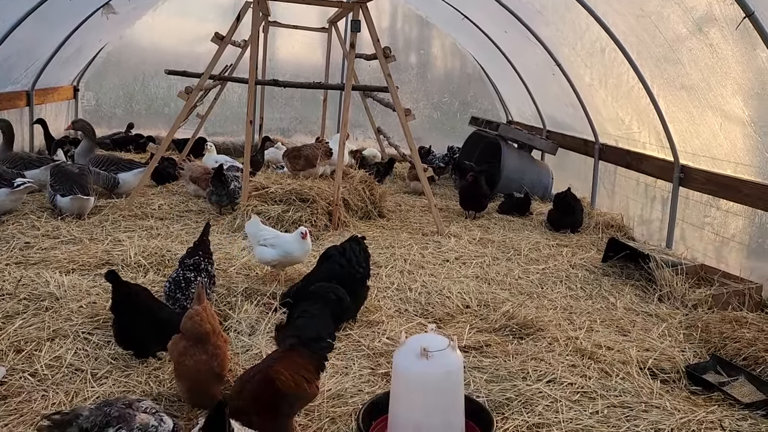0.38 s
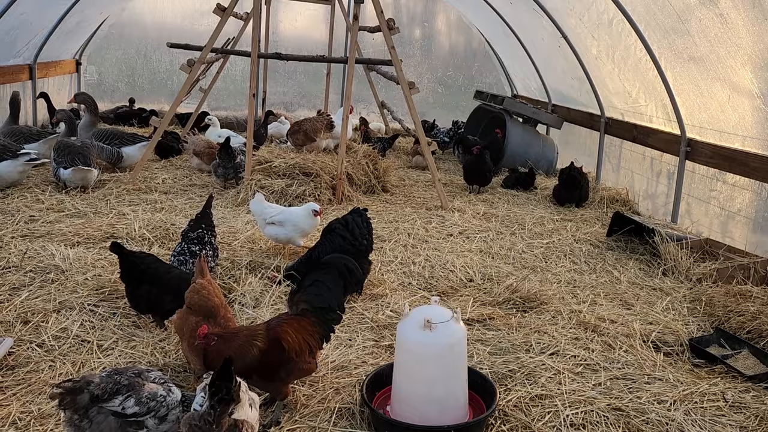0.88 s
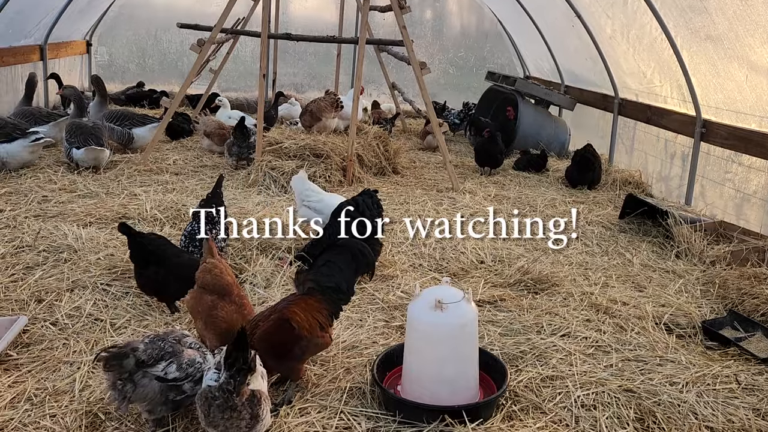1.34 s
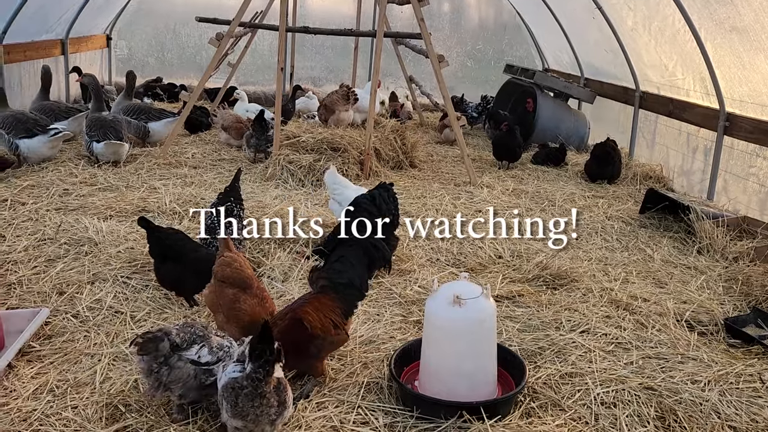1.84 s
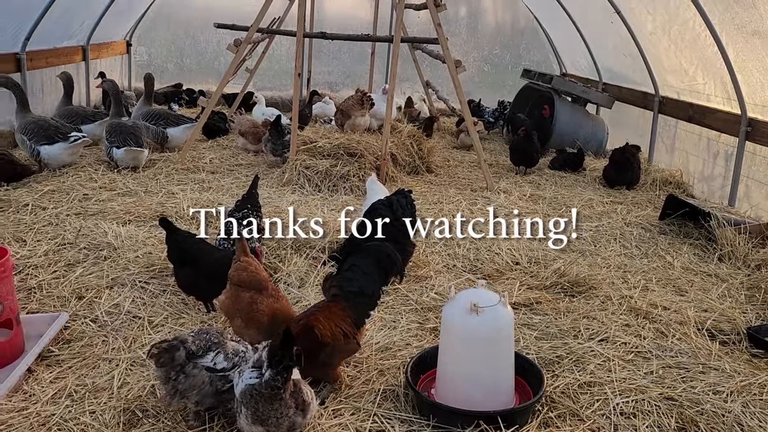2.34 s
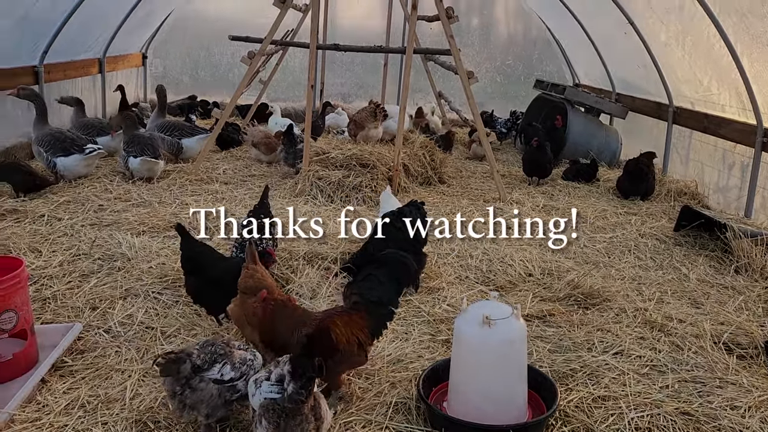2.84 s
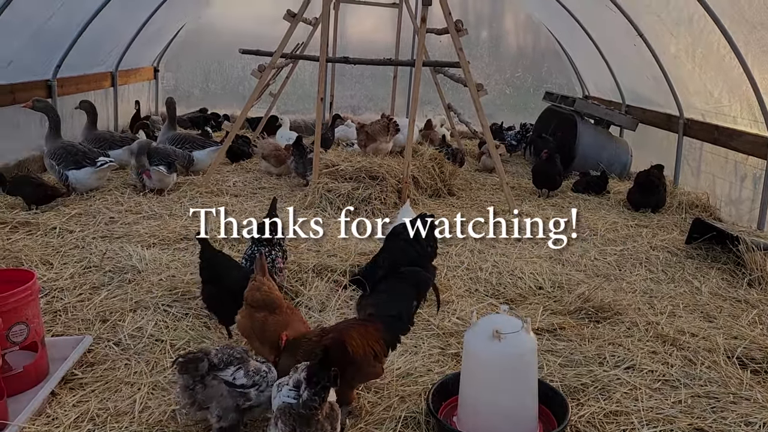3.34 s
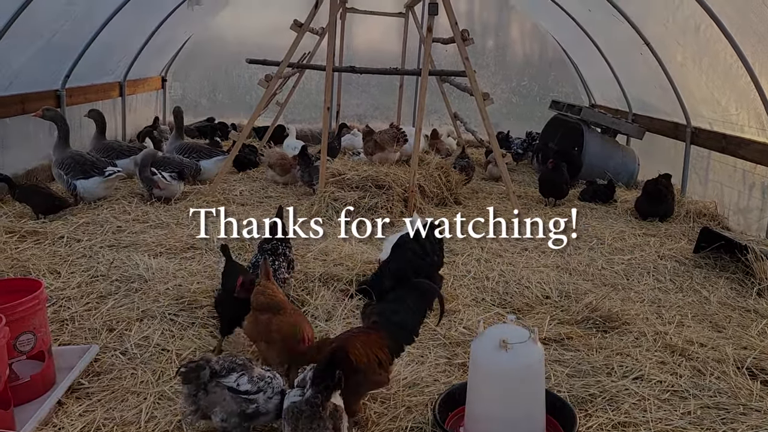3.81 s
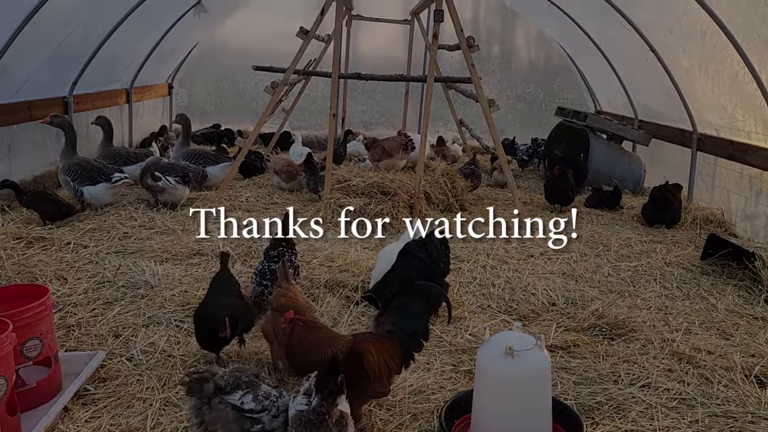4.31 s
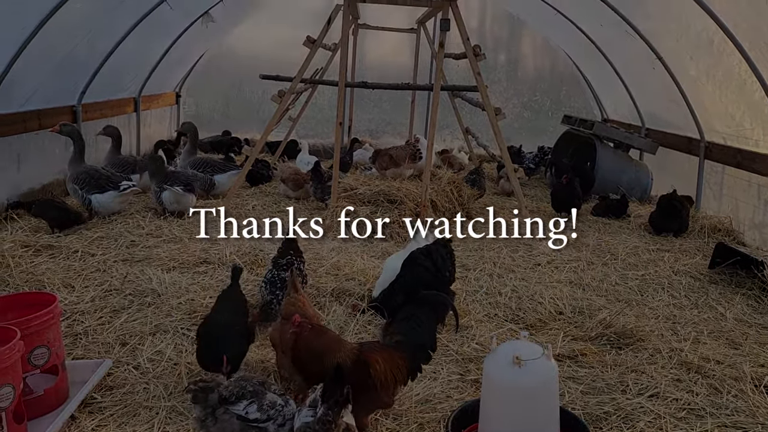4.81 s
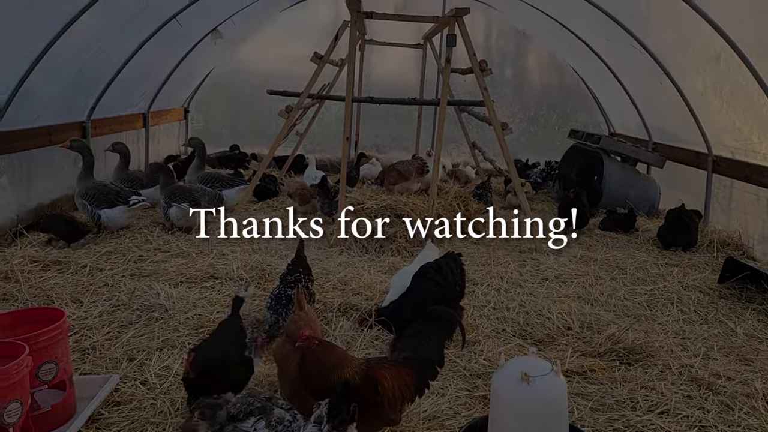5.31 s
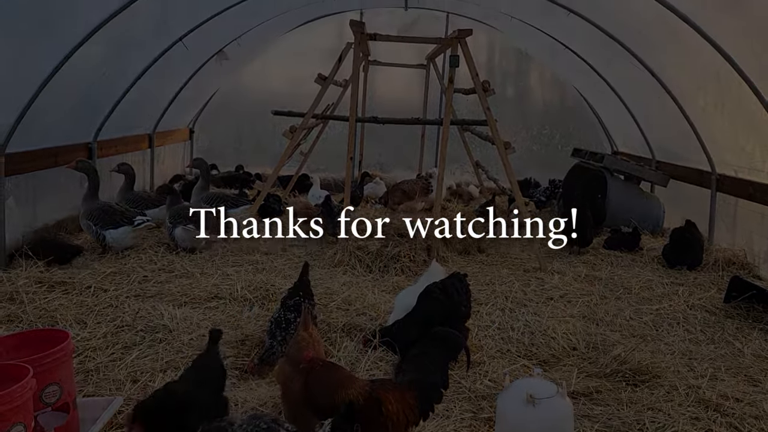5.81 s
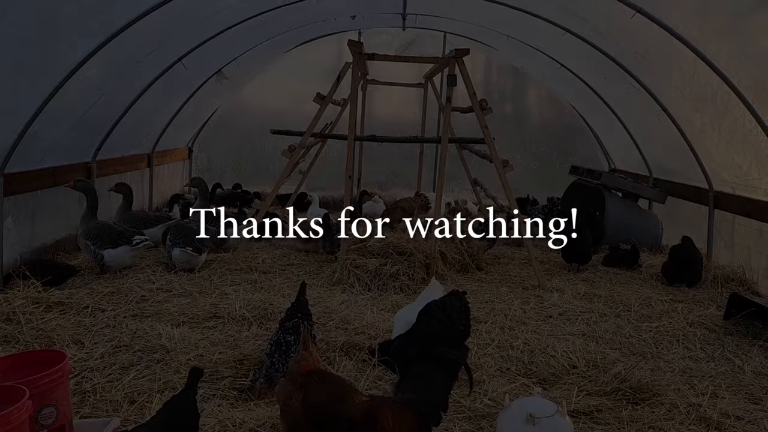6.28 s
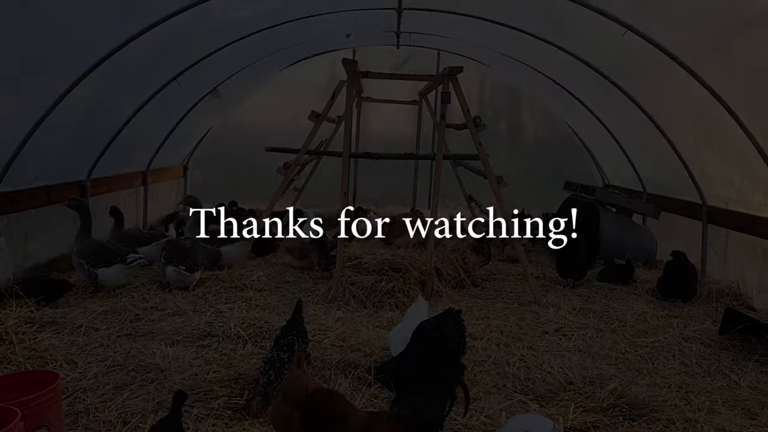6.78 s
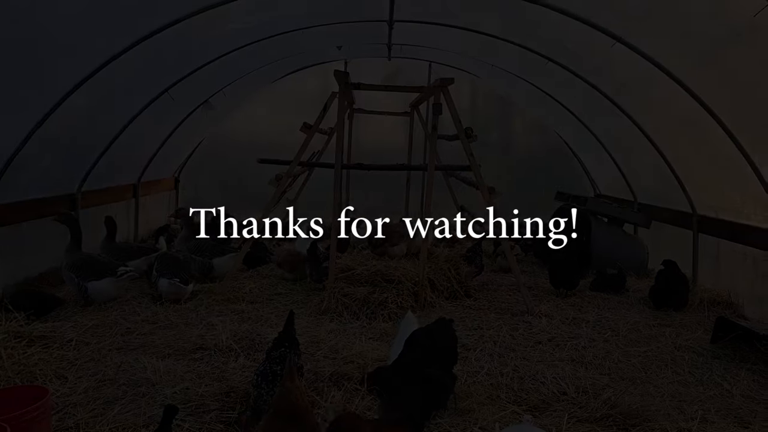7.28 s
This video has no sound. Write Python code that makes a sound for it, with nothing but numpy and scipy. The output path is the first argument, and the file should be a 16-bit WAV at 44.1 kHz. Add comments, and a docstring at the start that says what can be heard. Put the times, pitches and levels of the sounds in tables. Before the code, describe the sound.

Inside a straw-floored plastic shelter, rapid goose honking gives way to clucks, sharp squawks and three drawn-out, cracking hen calls as ambience fades.

```python
"""Geese gabble and honk at the far end of a straw-floored plastic tunnel: harmonic tones and puffed pulses
excite throat resonances. A near hen sings long wavering notes, with period doubling on the low ones, and
hens cluck. Filtered noise makes straw rustle, snaps and wind on the sheeting; decaying low sines make
footfalls. The birds ring in a short noise tail; straw bed and wind fade slowly."""
import sys
import numpy as np
from scipy import signal
from scipy.fft import rfft, irfft, next_fast_len
from scipy.io import wavfile
from scipy.ndimage import uniform_filter1d, map_coordinates

SR = 44100
rng = np.random.default_rng(int(sys.argv[2]) if len(sys.argv) > 2 else 0)


def volts_from_db(level):
    """Convert decibel levels to linear amplitude ratios."""
    exponent = np.asarray(level, float) / 20
    return 10 ** exponent


def transcribe(signal):
    """Save signal, clipped to [-1, 1], as a 16-bit WAV file at the path in sys.argv[1]."""
    frames = np.atleast_2d(signal).T
    limited = np.clip(frames, -1, 1)
    pcm = np.round(limited * 32767).astype(np.int16)
    wavfile.write(sys.argv[1], SR, pcm)


N = 337353  # samples


def unit(x):
    """Power normalisation: scales a signal to rms 1."""
    return x / np.sqrt(np.mean(x ** 2) + 1e-20)


def along(points, hz):
    """Spectral envelope: interpolates (frequency [Hz], value) points on a log frequency axis."""
    f, v = np.transpose(points)
    return np.interp(np.log(hz + 1), np.log(f + 1), v)


def wobble(rate, size=N):
    """Band-limited randomness: a smooth curve through random knots, rate knots a second."""
    knots = rng.standard_normal(int(size * rate / SR) + 4)
    return map_coordinates(knots, [np.arange(size) * rate / SR])


def filtered(x, response):
    """Linear filtering: multiplies the spectrum by a response of frequency."""
    m = next_fast_len(len(x) + SR // 8)
    return irfft(rfft(x, m) * response(np.fft.rfftfreq(m, 1 / SR)), m)[:len(x)]


def modes(table, ratio):
    """Modal superposition: causal resonances of alternating sign, all centres moved by one ratio."""
    def response(f):
        return sum((-1) ** k * volts_from_db(db) * 1j * f * w / ((c * ratio) ** 2 - f * f + 1j * f * w)
                   for k, (c, w, db) in enumerate(table))
    return response


def add(track, s, x):
    """Linear superposition: mixes x into the track from time s."""
    part = track[max(round(s * SR), 0):][:len(x)]
    part += x[:len(part)]


def breath(length, rise):
    """Breath envelope: progress 0-1 through a call and the swell of its air pressure."""
    u = np.linspace(0, 1, max(round(length * SR), 2))
    return u, np.sin(np.pi * u ** rise)


def stack(pitch, throat_db, flutter_db):
    """Source-filter voice: harmonics weighted by the throat, each fluttering on its own, rms 1."""
    k = np.arange(1, int(min(SR / 5 / pitch.max(), 30)) + 1)[:, None]
    phase = 2 * np.pi * np.cumsum(pitch) / SR
    flutter = np.array([wobble(57.0, size=len(pitch)) for _ in k])
    level_db = throat_db(k * pitch) + flutter_db * np.sqrt(np.minimum(k, 4)) * flutter
    return unit(np.sum(volts_from_db(level_db) * np.cos(k * phase - k * k / 4), axis=0))


def fade_db():
    """Slow amplitude envelope shared by the straw bed and the wind."""
    # level offset: (time [s], level [dB])
    fade = [(0, 2.5), (3.1, 0.5), (6.3, -3.5), (7, -9), (7.65, -11)]
    return np.interp(np.arange(N) / SR, *np.transpose(fade))


def honks():
    """Amplitude modulation: a syrinx tone swoops up, then bends late; throat flutter adds sidebands."""
    # deep goose, bending to one low note: (start [s], length [s], held pitch [Hz], level before shaping [dB])
    deep_honks = [(0.586, 0.073, 620, -29.5), (0.807, 0.04, 578, -33.5), (0.988, 0.072, 574, -30),
                  (1.691, 0.06, 573, -27.5), (1.911, 0.043, 571.7, -33), (2.085, 0.045, 612, -38),
                  (2.244, 0.079, 554, -34.5)]
    # other geese: (start [s], length [s], held pitch [Hz], level before shaping [dB], bill resonance [Hz])
    level_honks = [(0, 0.019, 719, -39.5, 720), (0.148, 0.098, 689.5, -41, 700),
                   (0.206, 0.054, 1059, -42.5, 1030), (0.385, 0.036, 934, -41, 935),
                   (0.748, 0.0578, 1065, -36.5, 2070), (0.903, 0.011, 922, -28.5, 920),
                   (1.242, 0.098, 602, -36.5, 1030), (1.686, 0.01, 635, -33.5, 1250),
                   (1.848, 0.088, 772.5, -36.5, 1040), (2.03, 0.074, 765, -37.5, 1050),
                   (3.759, 0.11, 1004, -60, 2920), (5.958, 0.035, 1040, -60.5, 3120),
                   (6.017, 0.071, 996, -57, 3030)]
    # common throat envelope before bill and shrillness: (frequency [Hz], level [dB])
    trumpet = [(400, 2), (600, 6.5), (1150, -2), (1700, -2), (2100, -12), (3100, 3.5), (4000, -31),
               (5300, -13), (6500, -16.5), (10000, -41.5)]
    deep_end_hz, deep_bill_hz = 466, 1110
    level_sag = 0.88  # final pitch target over held pitch
    shrill_db_per_octave = 15.5

    out = np.zeros(N)
    calls = [(s, length, hz, deep_end_hz, db, deep_bill_hz) for s, length, hz, db in deep_honks]
    calls += [(s, length, hz, hz * level_sag, db, bill) for s, length, hz, db, bill in level_honks]
    for s, length, first, last, db, bill_hz in calls:
        u, swell = breath(length, rise=0.98)
        late_bend = first + (last - first) * u ** 3.5
        arch = late_bend * (1 - .07 * np.exp(-u / .14))  # the swoop up
        pitch = arch * (1 + .003 * wobble(100, size=len(u)))
        shrill_db = shrill_db_per_octave * np.log2(first / 760)  # high voices carry more top

        def throat(hz):
            bill_db = 13 * np.exp(-((hz - bill_hz) / 350) ** 2)
            return along(trumpet, hz) + bill_db + shrill_db * (hz > 3800)

        flutter_hz = 195 + 25 * wobble(40, size=len(u))
        rasp = 1 + .18 * np.sin(2 * np.pi * np.cumsum(flutter_hz) / SR)
        add(out, s, volts_from_db(db) * swell ** 0.61 * rasp * stack(pitch, throat, flutter_db=1.1))
    # the windpipe passes little below the note
    return filtered(out, lambda hz: (1j * hz / (440 + 1j * hz)) ** 3)


def straw():
    """Noise shaping and impulse response: patchy hiss as feet shift, and stalks that snap."""
    # relative noise spectrum: (frequency [Hz], level per Hz [dB])
    rustle = [(150, -36.5), (280, -8.5), (501, -5.5), (788, -2.5), (1530, -11.5), (1980, -6.5), (3980, -9),
              (7440, -3), (10700, -16), (16000, -12.5)]
    # feet shuffling in the straw: (middle [s], length [s], level [dB])
    shuffles = [(0.77, 0.16, -62.5), (1.305, 0.089, -52), (1.598, 0.46, -62.5), (2.77, 0.21, -59),
                (3.185, 0.06, -47.5), (4.043, 0.27, -59), (4.773, 0.08, -61), (5.595, 0.21, -68),
                (6.103, 0.38, -63.5)]
    # snapping stalks: (start [s], peak level [dB], resonance [Hz])
    snaps = [(0.333, -42, 7200), (2.61, -31, 6560), (2.661, -33.5, 6600), (2.826, -29.5, 1440),
             (5.0903, -38, 2560), (5.8733, -44.5, 1820), (6.145, -38.5, 1610)]
    straw_db = -62  # before the fade

    crackle_db = 2.14 * wobble(300) + 1.52 * wobble(25) + 0.34 * wobble(12)
    z = signal.stft(rng.standard_normal(N) * volts_from_db(crackle_db), nperseg=512)[2]
    # patches in time and frequency
    field = uniform_filter1d(uniform_filter1d(rng.standard_normal(z.shape), 12, 0), 6, 1)
    hiss = signal.istft(z * volts_from_db(3.3 * unit(field)), nperseg=512)[1][:N]
    out = unit(filtered(hiss, lambda hz: volts_from_db(along(rustle, hz))))
    stirred = sum(volts_from_db(db) * np.exp(-(2 * (np.arange(N) / SR - s) / length) ** 2)
                  for s, length, db in shuffles)
    out = out * (volts_from_db(straw_db + fade_db()) + stirred)

    t = np.arange(SR // 50) / SR
    for s, db, hz in snaps:
        burst = rng.standard_normal(len(t)) * volts_from_db(-60 * t / .005)  # falls 60 dB in 5 ms
        snap = filtered(burst, lambda f: modes([(hz, hz, 0)], 1)(f) ** 2)
        add(out, s, volts_from_db(db) * snap / np.abs(snap).max())
    return out


def wind():
    """Low-frequency noise: the sheeting rumbles with a slow random change of level."""
    # relative noise spectrum: (frequency [Hz], level per Hz [dB])
    rumble_shape = [(12, -42), (20, -11), (62, -1), (120, -10), (201, -19.5), (400, -71.5), (880, -120)]
    wind_db = -60.5  # before fade and lumps
    rumble = unit(filtered(rng.standard_normal(N), lambda hz: volts_from_db(along(rumble_shape, hz))))
    return rumble * volts_from_db(wind_db + fade_db() + 2.4 * wobble(7))


def gabble():
    """Pulse-excited resonance: slow uneven pulses, each with a puff of air noise, ring chest and bill."""
    # hoarse calls: (start [s], length [s], chest level [dB], bill level [dB], resonance frequency ratio)
    gabble_calls = [(0.172, 0.074, -46, -50, 0.92), (0.281, 0.064, -57, -58.5, 0.92),
                    (0.39, 0.023, -49, -45.5, 0.91), (0.493, 0.2, -54.5, -70, 0.72),
                    (0.572, 0.1, -45.5, -49, 0.97), (0.768, 0.084, -42.5, -45.5, 0.97),
                    (0.879, 0.04, -51, -48, 0.88), (0.988, 0.22, -48, -51, 0.93),
                    (1.072, 0.081, -42.5, -44.5, 1.136), (1.156, 0.073, -75, -57.5, 0.77),
                    (1.254, 0.11, -43, -44, 1.04), (1.393, 0.078, -75, -55.5, 0.82),
                    (1.464, 0.12, -44, -44.5, 1.02), (1.659, 0.12, -50, -49.5, 0.94),
                    (1.871, 0.06, -46, -49.5, 0.95), (1.962, 0.12, -58.5, -50.5, 0.85),
                    (2.062, 0.069, -45, -46.5, 0.9), (2.219, 0.11, -66, -48, 0.89),
                    (3.136, 0.069, -49.5, -49.5, 1.19), (3.223, 0.021, -54, -57, 0.89),
                    (3.318, 0.044, -81, -54, 0.828), (3.425, 0.05, -50, -63, 0.98),
                    (3.569, 0.054, -71, -56, 0.85), (4.931, 0.072, -54, -61.5, 0.89),
                    (5.151, 0.022, -51.5, -62, 0.92), (6.408, 0.086, -52, -57.5, 0.96),
                    (6.609, 0.11, -51.5, -59.5, 1.024), (6.822, 0.1, -52.5, -54, 0.99),
                    (6.999, 0.021, -79, -57.5, 1.08), (7.205, 0.082, -65, -71, 0.85)]
    # chest resonances at ratio 1: (centre [Hz], width [Hz], level of one pass [dB])
    chest_modes = [(167, 185, -1.5), (660, 118, 6.5), (1176, 485, 2.5)]
    # bill resonances at ratio 1: (centre [Hz], width [Hz], level of one pass [dB])
    bill_modes = [(2052, 420, 5), (3046, 135, 5.5), (3370, 184, 9.5), (4310, 2770, 0.5), (5530, 1320, 3.5),
                  (7560, 3100, -11.5)]

    out = np.zeros(N)
    for s, length, chest_db, bill_db, ratio in gabble_calls:
        u, swell = breath(length, rise=0.67)
        pulse_hz = rng.normal(185, 9) * (1 + .022 * wobble(120, size=len(u)))
        cycle = np.cumsum(pulse_hz) / SR
        pulses = unit(np.diff(np.floor(cycle), prepend=0) * volts_from_db(3.7 * wobble(191, size=len(u))))
        puffs = unit(np.exp(-3 * (cycle % 1)) * rng.standard_normal(len(u)))
        drive = np.pad(swell ** 1.3 * (pulses + .36 * puffs), (0, 400))

        def chest_response(hz):
            valley_db = -12 * np.exp(-((hz - 340) / 110) ** 2)
            return modes(chest_modes, ratio)(hz) ** 2 * volts_from_db(valley_db)  # squared for steep flanks

        chest = filtered(drive, chest_response)
        # the bill opens and its ring rises
        opening = np.pad(np.clip(u / .4, 0, 1), (0, 400), 'edge')
        bill = sum(filtered(drive * share, lambda hz: modes(bill_modes, ratio * wide)(hz) ** 2)
                   for share, wide in [(1 - opening, .88), (opening, 1)])
        add(out, s, volts_from_db(chest_db) * unit(chest) + volts_from_db(bill_db) * unit(bill))
    return out


def thuds():
    """Damped oscillation: each foot on the ground gives one dull low swing."""
    # footfalls: (start [s], strength before the common lift [dB])
    footfalls = [(0.237, -57), (0.532, -50.5), (5.867, -56.5)]
    out, t = np.zeros(N), np.arange(SR // 10) / SR
    for s, db in footfalls:
        # lifted 17.5 dB; falls 60 dB in 31 ms
        add(out, s, volts_from_db(db + 17.5 - 60 * t / 0.031) * np.sin(2 * np.pi * 105 * t))
    return out


def clucks():
    """Source-filter voice: grainy falling onsets; an open beak lifts the throat resonance."""
    # beak closed: (start [s], length [s], first pitch before the drop [Hz], last pitch [Hz],
    # level before swell and air [dB])
    closed_clucks = [(1.511, 0.11, 270.4, 252, -52.5), (1.769, 0.084, 273, 271.6, -48),
                     (1.981, 0.031, 245, 232, -43), (2.111, 0.031, 226, 229, -42),
                     (2.435, 0.052, 205, 217, -54), (2.645, 0.095, 253, 292, -50),
                     (2.95, 0.11, 200.4, 307.1, -46), (3.399, 0.053, 235.6, 207, -48.5),
                     (3.627, 0.081, 295, 322.5, -48.5), (7.435, 0.11, 277, 257, -65.5),
                     (4.938, 0.054, 208, 219.4, -54), (7.159, 0.087, 287, 286, -64)]
    # sharp, beak open: (start [s], length [s], first pitch before the drop [Hz],
    # level before swell and air [dB])
    squawks = [(3.153, 0.041, 540.4, -37), (3.212, 0.031, 573, -43.5), (3.442, 0.023, 545, -43),
               (4.572, 0.037, 518, -37.5), (4.65, 0.048, 590, -48.5), (5.612, 0.018, 270, -59),
               (6.033, 0.032, 545, -46), (6.107, 0.038, 515, -40.5), (6.178, 0.038, 605, -44.5),
               (6.989, 0.05, 528, -41)]
    # hoarse growls: (start [s], length [s], pitch before the drop [Hz],
    # level before swell and air [dB], throat frequency ratio)
    growls = [(2.541, 0.033, 174.9, -52, 2.2), (2.771, 0.076, 177.5, -48, 2.02),
              (3.037, 0.23, 157.6, -42.5, 0.96), (4.112, 0.039, 321, -44.5, 1.15),
              (4.228, 0.06, 206, -43, 0.945), (4.363, 0.055, 207.8, -42.5, 1.05)]
    # closed throat at ratio 1: (frequency [Hz], level [dB])
    closed_throat = [(100, -28), (200, -7), (300, -0.5), (580, 1), (750, -10.5), (1300, -19), (2200, -36.5),
                     (3600, -29), (4000, -38), (4400, -22.5), (5000, -42), (6000, -72)]
    # open beak: (frequency [Hz], level [dB])
    open_beak = [(300, -13), (520, -7.5), (800, 4), (1080, 1.5), (1300, -2.5), (1600, -17.5), (2200, -29),
                 (3200, -25.5), (5000, -59)]
    throat_match_hz = 276  # pitch at which the closed throat has ratio 1; in clucks it follows the note
    throat_sinks = 0.51  # share by which the closed throat's ring falls
    squawk_fall = 0.91  # last pitch over first, before the drop

    out = np.zeros(N)
    # each kind adds its drop from above and its hoarseness, as shares of the pitch
    calls = [(s, length, first, last, db, (first + last) / 2 / throat_match_hz, .03, .012)
             for s, length, first, last, db in closed_clucks]
    calls += [(s, length, hz, hz * squawk_fall, db, None, .15, .02) for s, length, hz, db in squawks]
    calls += [(s, length, hz, hz, db, ratio, .14, .042) for s, length, hz, db, ratio in growls]
    for s, length, first, last, db, ratio, drop, hoarse in calls:
        u, swell = breath(length, rise=0.8)
        glide = (first + (last - first) * u) * (1 + drop * np.exp(-u / .18))
        pitch = glide * (1 + hoarse * wobble(120, size=len(u)))

        def throat(hz, scale=1):
            return along(closed_throat, hz / ratio / scale) if ratio else along(open_beak, hz)

        air = unit(filtered(rng.standard_normal(len(u)), lambda hz: volts_from_db(throat(hz))))
        scale = 1 + throat_sinks * (.5 - u)  # the neck stretches through the call, so its ring falls
        voice = stack(pitch, lambda hz: throat(hz, scale ** (hz < 2000)), flutter_db=1.1)
        add(out, s, volts_from_db(db) * swell ** 1.2 * (voice + 10 * hoarse * air))
    return out


def song():
    """Period doubling: low notes weaken every second cycle, giving lines halfway between harmonics."""
    # notes flipping between two registers, one row a stretch: (start [s], starting pitch [Hz],
    # climb [Hz], level before throat and flutter [dB], extra overtone level [dB])
    notes = [
        [(2.69, 748, -20.5, -54.5, -16), (2.82, 721, -16, -48, -23), (2.99, 701.5, -13, -50, -4.5),
         (3.22, 690.3, 28.5, -47.5, -2.5), (3.43, 705, 13.5, -47, -2.5), (3.565, 677.4, -9, -46, -2),
         (3.71, 693, 26.5, -45.5, 0), (3.8, 731, 9.5, -44.5, 0), (3.87, 643, 9.5, -42, -4),
         (3.92, 659, 7, -45.5, 0.5)],
        [(4.695, 677, -12.5, -53, -2.5), (4.735, 589, 10, -52.5, -3), (4.785, 703, 15.5, -49, -14),
         (4.895, 625, -17.5, -47.5, -6), (5.0, 708.6, 16, -50, 2.5), (5.205, 621.6, 5.5, -45.5, -2),
         (5.29, 698, -0.5, -48.5, -4), (5.345, 626, 32, -46, 1.5), (5.395, 595, 30.5, -44.5, -2.5),
         (5.465, 665, 10, -57.5, -14)],
        [(6.222, 713, -16, -53, -9), (6.247, 602, -2.5, -46.5, -8), (6.292, 696, 14.5, -46, -4.5),
         (6.375, 595, -8.5, -45, -5), (6.43, 602.5, 12.5, -46.5, -5.5), (6.48, 623, 11, -47, -2.5),
         (6.612, 660, -18.5, -48.5, -4), (6.73, 621.5, 37.5, -49, -2), (6.84, 621, 1.5, -51, 0.5)],
    ]
    # note ends: (time [s])
    ends = [4.035, 5.515, 6.925]
    # throat envelope: (frequency [Hz], level [dB])
    singer = [(310, -34.5), (450, -32), (650, 2), (950, -4), (1250, 0), (1430, -4.5), (1560, -20),
              (1900, -23.5), (2400, -35.5), (3300, -24.5), (4100, -30.5), (5200, -35.5)]
    # the first note shakes for a moment: (from [s], to [s], rate [Hz], depth [Hz])
    trill = (3.56, 3.715, 17, 23.7)
    onset_s, release_s = 0.0039, 0.024

    out = np.zeros(N)
    k = np.arange(1, 17)[:, None] / 2  # harmonics and the lines halfway between
    begin, stop, rate_hz, depth_hz = trill
    for note, end in zip(notes, ends):
        s, start_hz, climb_hz, mean_db, over_db = np.transpose(note)
        t = np.arange(s[0], end, 1 / SR)
        place = np.interp(t, np.append(s, end), np.arange(len(s) + 1))
        row = np.minimum(place.astype(int), len(s) - 1)
        pitch = uniform_filter1d(start_hz[row] + climb_hz[row] * (place - row), SR // 90)
        shaking = (t > begin) & (t < stop)
        pitch = pitch + depth_hz * shaking * np.cos(2 * np.pi * rate_hz * (t - begin))
        unrest = np.clip((680 - pitch) / 40, 0, 1)  # the low register is unsteady
        jitter = .007 * wobble(85, size=len(t)) + .009 * wobble(40, size=len(t))
        phase = 2 * np.pi * np.cumsum(pitch * (1 + jitter)) / SR

        db = uniform_filter1d(mean_db[row], SR // 40)
        break_db = -30 * np.clip((pitch - 640) / 45, 0, 1)  # the voice breaks only on its low notes
        effort_db = (k > 1) * uniform_filter1d(over_db[row], SR // 40)
        flutter = np.array([wobble(50, size=len(t)) for _ in k])
        flutter_db = (1.3 * np.minimum(k, 2) + .6 * unrest) * flutter
        level_db = db + along(singer, k * pitch) + (k % 1 > 0) * break_db + effort_db + flutter_db

        edges = np.clip(np.minimum((t - s[0]) / onset_s, (end - t) / release_s), 0, 1)
        # the upper partials are hoarse; breath noise fills in between the lines
        rasp = np.clip(k - 2.5, 0, 2) * np.array([wobble(500, size=len(t)) for _ in k])
        grain = 1 + (.07 + .16 * unrest) * wobble(320, size=len(t)) + .3 * rasp
        partials = grain * volts_from_db(level_db) * np.sin(k * phase)
        add(out, s[0], np.sqrt(2) * edges * np.sum(partials, axis=0))
    return out


def tunnel(x):
    """Reverberation by convolution: short noise tails whose decay depends on frequency."""
    # time to fall 60 dB: (frequency [Hz], decay time [s])
    decay = [(300, 0.074), (1000, 0.15), (3000, 0.14), (8000, 0.056)]
    out, step = np.zeros(N), SR // 4  # a tail is drawn afresh every quarter second
    for start in range(0, N, step):
        hz, t, z = signal.stft(rng.standard_normal(SR // 3), SR, nperseg=256)
        tail = signal.istft(z * volts_from_db(-60 * t / along(decay, hz)[:, None]), SR, nperseg=256)[1]
        wet = signal.fftconvolve(x[start:start + step], tail / np.linalg.norm(tail))
        add(out, start / SR + .006, wet)  # 6 ms after the direct sound
    return out


def scene():
    """Direct-to-reverberant ratio: the far geese are wetter than the near hens."""
    geese = honks() + gabble()
    hens = clucks() + song()
    wet = tunnel(volts_from_db(-2.5) * geese + volts_from_db(-13.0) * hens)
    return (geese + hens + wet + straw() + thuds() + wind())[None]


def roll_off(x):
    """The treble ends steeply here."""
    return signal.sosfilt(signal.butter(12, 15850, fs=SR, output="sos"), x)


def record(dry):
    """Monophonic pickup: the finished mix is taken as one channel."""
    return roll_off(dry)


dry = scene()
out = record(dry)
transcribe(out)
```